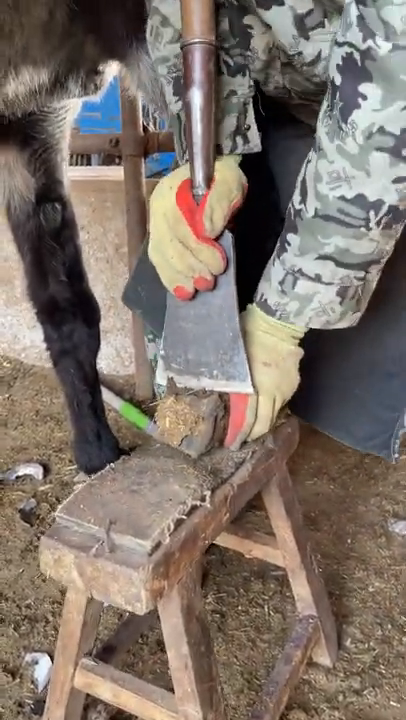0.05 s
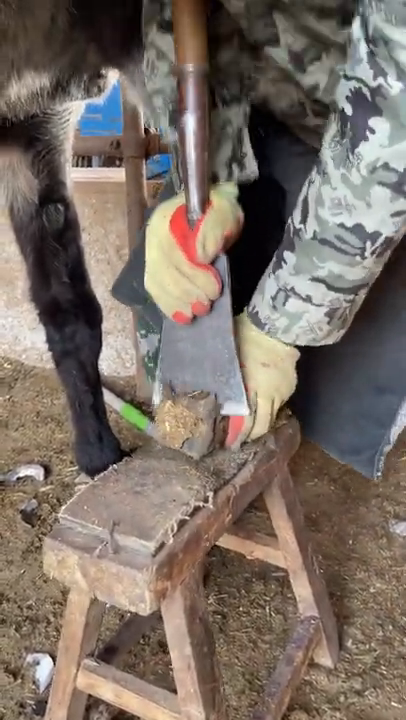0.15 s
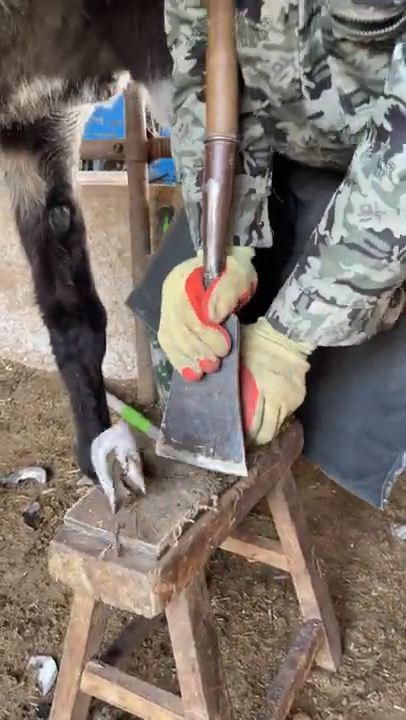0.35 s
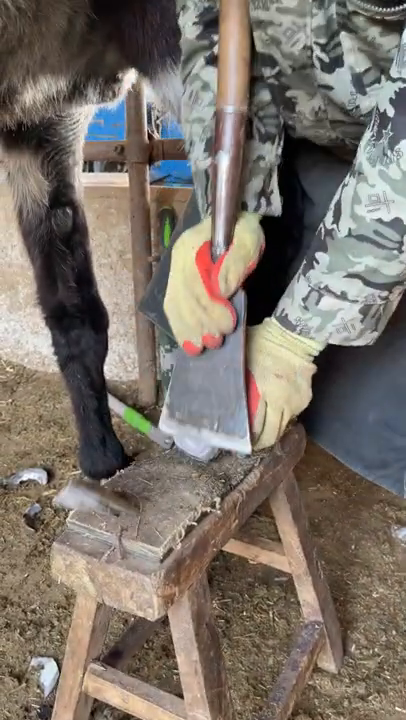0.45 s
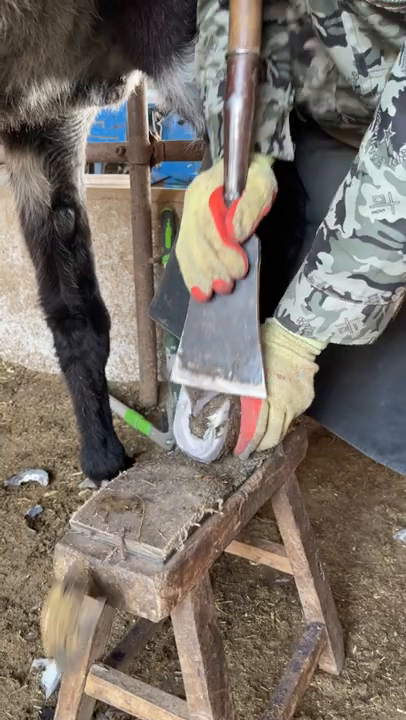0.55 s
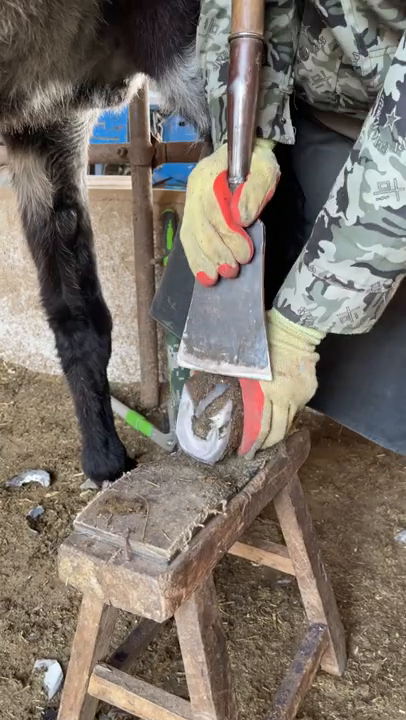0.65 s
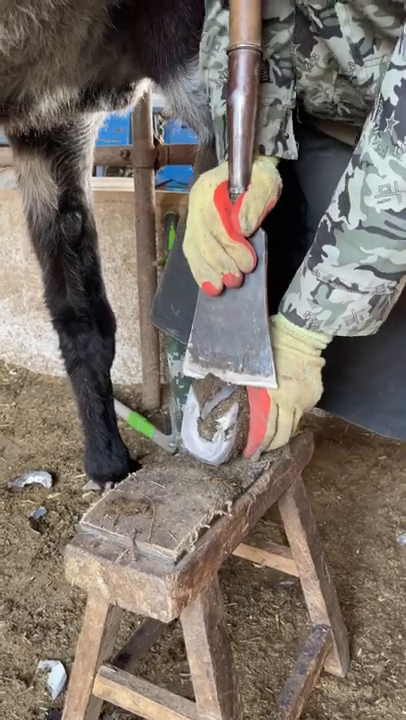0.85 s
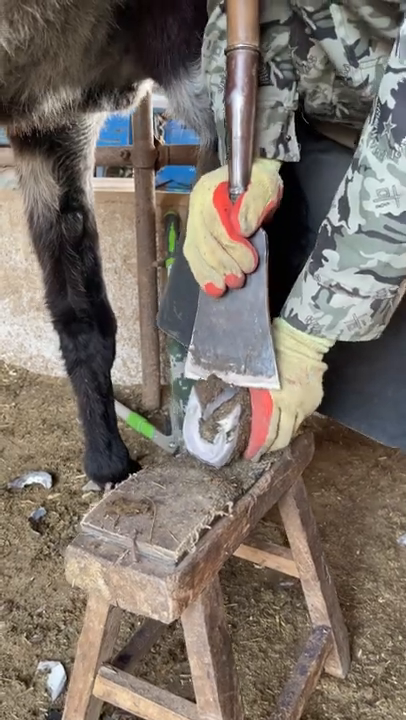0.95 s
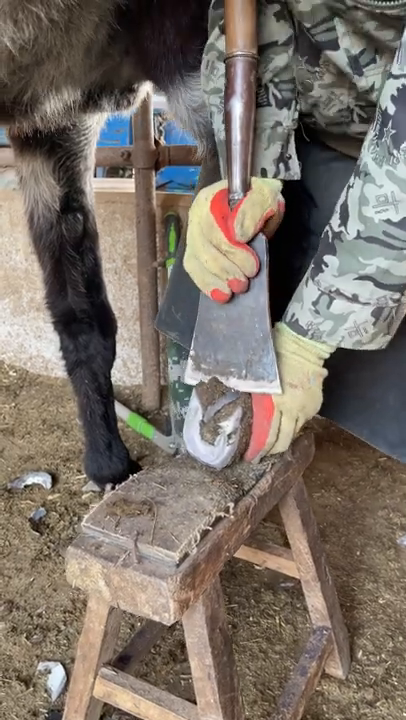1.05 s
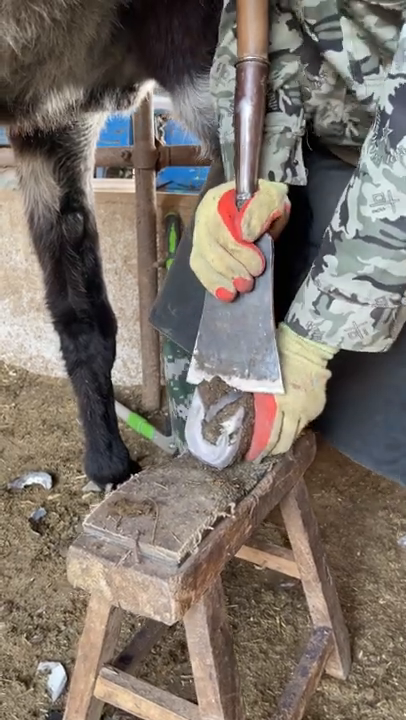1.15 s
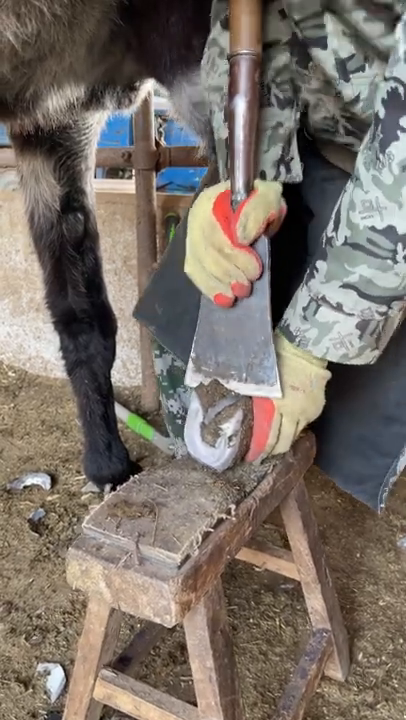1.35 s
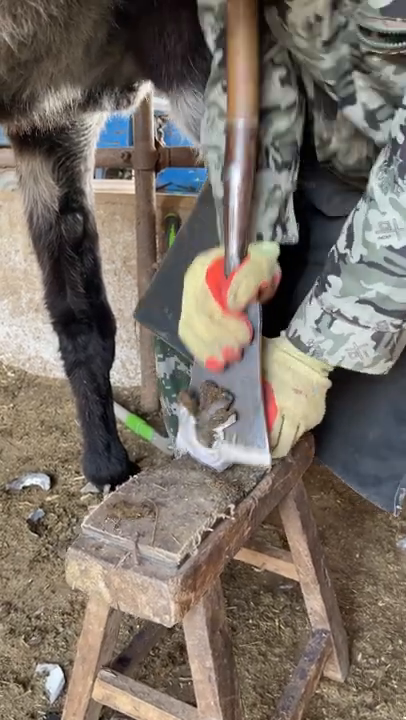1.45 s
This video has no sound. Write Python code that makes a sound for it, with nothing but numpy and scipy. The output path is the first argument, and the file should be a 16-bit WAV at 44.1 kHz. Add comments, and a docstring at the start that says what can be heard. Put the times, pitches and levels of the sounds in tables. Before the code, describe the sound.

Close up, a blade rasps briefly through hard hoof, squeaks, then cracks off the slice and knocks the wooden stool; faint ticks follow, and a second rasp begins at the end, in a lightly echoing shed.

```python
"""A broad steel blade pares a hard hoof on a wooden stool in a farm shed; a second cut begins late.
The horn rasps as shaped noise from dense tiny fractures, and squeaks as short bouts of narrow noise.
As the slice cracks off and the blade lands, clicks ring decaying sines of blade and stool.
Chips, glove and blade tick as brief resonant grit; a low rumble, hums and hiss lie beneath.
Far birds chirp as sliding sines heard only through their echo, and the shed answers the work."""
import sys
import numpy as np
from scipy import signal
from scipy.fft import rfft, irfft
from scipy.io import wavfile

SR = 44100
rng = np.random.default_rng(int(sys.argv[2]) if len(sys.argv) > 2 else 0)


def to_wav(s):
    """Save 16-bit WAV."""
    ch = np.atleast_2d(s).T  # columns
    pcm = np.round(np.clip(ch, -1, 1) * 32767)  # PCM
    wavfile.write(sys.argv[1], SR, pcm.astype(np.int16))


N = 66150
T = np.arange(N) / SR  # time [s]

# steady low bed, rescaled to RUMBLE_DB: (frequency [Hz], relative density [dB per Hz])
RUMBLE_SPECTRUM = [(20, -50), (32, -1.5), (48, 0), (62, -1), (85, -7), (125, -4), (165, -16.5),
                   (235, -17.5), (330, -24.5), (600, -36), (1200, -79)]
# faint airy bed, rescaled to HISS_DB: (frequency [Hz], relative density [dB per Hz])
HISS_SPECTRUM = [(200, 11.5), (600, 7), (1200, -0.5), (1800, -2.5), (2400, 1), (4000, -5.5), (6000, -9),
                 (8000, -2.5), (9700, 1.5), (11000, -13), (11800, -44), (15000, -61)]
# wavering steady tones: (frequency [Hz], rms level [dB])
HUMS = [(61, -48.5), (1725, -76.5)]
RUMBLE_DB, HISS_DB = -43.5, -57  # rms levels
HUM_WIDTH_HZ = 9  # a wider band wavers faster

# push on the blade, one list per cut: (time [s], level [dB])
CUT_PUSHES = [
    [(0.150, -71), (0.171, -62), (0.186, -66), (0.199, -45), (0.212, -46), (0.230, -43), (0.245, -38),
     (0.259, -48.5), (0.272, -32.5), (0.282, -27.5), (0.290, -44), (0.304, -50)],
    [(1.380, -69), (1.415, -57.5), (1.424, -51.5), (1.445, -48.5), (1.468, -42), (1.487, -46.5),
     (1.500, -38)],
]
# colour of the tearing horn: (frequency [Hz], relative density [dB per Hz])
RASP_SPECTRUM = [(150, -13), (350, 2.5), (650, -3), (1250, 1.5), (2000, 0.5), (2700, -0.5), (3900, -3.5),
                 (5000, -1.5), (7500, 0), (9800, 1.5), (11500, -10.5), (13000, -21), (15500, -39)]
# the push shakes leg and stool: (frequency [Hz], width [Hz], level over the push [dB])
SHUDDER_BANDS = [(84, 33, 3.5), (130, 42, -8), (262.6, 95, 1)]
RASP_DB = 9  # tearing, over the push
FRACTURES_PER_S, FRACTURE_SPREAD_DB = 5400, 2.5
CLUMP_DB, CLUMPS_HZ = 1.43, 196  # rms swing and centre rate of the bunching

# small contacts of chips, glove and blade:
# (time [s], nominal peak level [dB], frequency [Hz], width [Hz], time to fall 60 dB [s])
TICKS = [(0.200, -24.5, 1170, 594, 0.017), (0.4149, -19, 9220, 1930, 0.019),
         (0.473, -39.5, 8800, 1750, 0.087), (0.546, -41, 602, 90, 0.084), (0.547, -44, 1320, 400, .04),
         (0.551, -38.5, 149, 127, 0.33), (0.638, -44.5, 900, 950, .03), (0.693, -43, 2140, 484, 0.02),
         (0.7282, -34, 2150, 580, 0.018), (0.763, -44.5, 8000, 3060, .06), (0.768, -37.5, 230, 130, 0.095),
         (0.766, -42.5, 4130, 1190, 0.056), (0.779, -46, 2180, 805, 0.029), (0.849, -37, 8880, 2500, 0.011),
         (0.912, -44.5, 9000, 2400, 0.013), (0.974, -43.5, 6480, 1480, 0.024),
         (0.992, -55, 7000, 5000, .015), (1.336, -42.5, 7460, 3000, 0.018), (1.344, -36, 1070, 350, 0.017),
         (1.421, -33, 1110, 1580, 0.075), (1.4285, -29, 1850, 1200, 0.017), (1.458, -23.5, 2080, 930, .016),
         (1.459, -18.5, 1290, 600, 0.012)]
TICK_ATTACK_S = 0.0004

# the edge sticks and squeaks: (middle [s], length [s], level at the middle [dB], frequency [Hz])
SQUEAKS = [(0.2204, 0.0039, -31, 2610), (0.231, 0.0085, -31, 2680), (0.245, 0.018, -33.5, 3050),
           (0.2741, 0.0074, -18.5, 2610)]
SQUEAK_WIDTH_HZ = 610

# the slice cracks off: (time [s], level before scatter [dB])
CRACKS = [(0.2752, -11), (0.2765, -6.5), (0.2823, -14.5), (0.2860, -21)]
# ringing modes of blade and hoof: (frequency [Hz], level [dB], time to fall 60 dB [s])
BLADE_MODES = [(520, -23, 0.0192), (780, -14.5, 0.019), (1000, -12, 0.013), (1102, -13, 0.029),
               (1376, -12.5, .022), (1534, -8.5, 0.017), (1700, -20, 0.012), (2027, -25.5, 0.034),
               (2335, -17.5, 0.023), (2500, -12, 0.027), (2880, -15.5, 0.0224), (3470, -20.5, 0.021),
               (4050, -20, 0.0092), (5105, -18, 0.011)]
# ringing modes of the stool: (frequency [Hz], level [dB], time to fall 60 dB [s])
STOOL_MODES = [(89.6, -7.5, 0.054), (220, -19, 0.095), (248.3, -10, 0.061), (366, -17.5, 0.037)]
CRACK_SCATTER_DB = 4.5
KNOCK_S, KNOCK_DB = 0.2742, -1
BENDING_LAG_S = 0.0046  # travel time at 1 kHz; lower frequencies take longer
HORN_DB, HORN_HZ, HORN_WIDTH_HZ = 22.5, 1083, 1440  # dull clack, gain over the landing blow

# far birds, each chirp sliding down:
# (time [s], length [s], start pitch [Hz], end pitch [Hz], level ahead of the echo [dB])
CHIRPS = [(0.463, 0.066, 5400, 3846, -59.5), (0.51, 0.075, 4140, 3810, -59.5),
          (0.731, 0.035, 5390, 5090, -61.5), (0.757, 0.09, 4510, 3210, -58.5),
          (1.151, 0.052, 6290, 6130, -66.5), (1.165, 0.08, 4475, 2658, -61.5)]
CHIRP_WAVER, WAVER_HZ = 0.053, 201  # rms share of the pitch, centre rate
BIRD_T60_S = 0.63

# decay of the shed's echo: (frequency [Hz], time to fall 60 dB [s])
SHED_DECAY = [(100, 0.78), (300, 0.81), (1000, 0.62), (3000, 0.75), (7000, 1), (11000, 0.87), (14000, .2)]
# strength of the shed's echo: (frequency [Hz], level [dB])
ECHO_STRENGTH = [(80, -12), (250, -14.5), (600, -16.5), (1200, -22), (1900, -17), (2450, -20), (3100, -20),
                 (4500, -20), (7000, -22), (10000, -18.5), (14000, -19)]
ECHO_BUILD_S = 0.0065
GROUND_ECHO_S, GROUND_ECHO_DB = 0.0031, -6.5

# stereo spread of scattered sound: (frequency [Hz], gain of side signal [dB])
DIFFUSE_SIDE = [(60, -41), (300, -9.5), (700, -3.5), (1300, -6), (1800, -15.5), (2500, -8), (4000, -2.5),
                (5000, -5), (5800, -20), (7000, -5), (8500, -31), (14000, -28)]
# phase between the microphone ports: (frequency [Hz], lead of left over right [rad])
PORT_PHASE = [(20, 0), (1700, 0), (2700, 1.2), (3900, .9), (4700, 3.1), (5400, 5.4), (5800, 6.2),
              (6200, 6.35), (7000, 7.2), (8800, 9.3), (9400, 9.5), (10300, 10.7), (11000, 11.2),
              (11900, 12.57), (16000, 12.57)]
# balance of the microphone ports: (frequency [Hz], left minus right [dB])
PORT_BALANCE = [(40, 0.4), (250, -3), (1000, -2.2), (2200, 0), (3300, 0), (4650, -0.5), (5600, -.5),
                (10000, 0)]
LOW_CUT_HZ, CUTOFF_HZ = 45.5, 15000


def from_db(db):
    """Decibels to gain."""
    return 10 ** (np.asarray(db) / 20)


def rms_one(x):
    """Scale to unit rms."""
    return x / np.sqrt(np.mean(x ** 2) + 1e-20)


def at_hz(points, hz):
    """Read a table on a log-frequency axis."""
    f, value = np.transpose(points)
    return np.interp(np.log(np.maximum(hz, 1)), np.log(f), value)


def colour(x, spectrum):
    """Filter a steady sound with a spectrum and scale it to unit rms."""
    hz = np.arange(N // 2 + 1) * SR / N
    return rms_one(irfft(rfft(x) * from_db(at_hz(spectrum, hz)), N))


def resonate(x, hz, width_hz):
    """Band-pass around one resonance."""
    low = (np.sqrt(width_hz ** 2 + (2 * hz) ** 2) - width_hz) / 2
    high = min(low + width_hz, SR / 2 - 10)
    return signal.sosfilt(signal.butter(2, [low, high], "band", fs=SR, output="sos"), x)


def ring(clicks, hz, t60):
    """A two-pole resonator: a unit click sets off a decaying sine of starting height 1."""
    radius = np.exp(-np.log(1000) / (t60 * SR))
    angle = 2 * np.pi * hz / SR
    poles = [1, -2 * radius * np.cos(angle), radius * radius]
    return signal.lfilter([0, np.sin(angle)], poles, clicks + 1e-18)


def clicks_at(times, gains):
    """Single-sample clicks."""
    return np.bincount((np.asarray(times) * SR).astype(int), gains, N)[:N]


def dying(t, t60):
    """Exponential decay from t = 0."""
    return np.exp(-np.log(1000) * np.maximum(t, 0) / t60)


def diffuse(mid, side):
    """Spread a sound over two ports by adding a filtered side signal to one and taking it from the other."""
    hz = np.arange(N + 1) * SR / (2 * N)
    spread = irfft(rfft(side, 2 * N) * from_db(at_hz(DIFFUSE_SIDE, hz)))[:N]
    return mid + spread * np.array([[1], [-1]])


def background():
    """A low rumble, hums of narrow noise that waver in level, and a faint wide hiss."""
    low, mid, side = rng.standard_normal((3, N))
    hums = np.zeros(N)
    for hz, db in HUMS:
        # drop the first half, where the narrow filter builds up
        tone = resonate(rng.standard_normal(2 * N), hz, HUM_WIDTH_HZ)[N:]
        hums += from_db(db) * rms_one(tone)
    rumble = from_db(RUMBLE_DB) * colour(low, RUMBLE_SPECTRUM)
    hiss = from_db(HISS_DB) * diffuse(colour(mid, HISS_SPECTRUM), colour(side, HISS_SPECTRUM))
    return hums + rumble + hiss


def fractures():
    """Dense tiny breaks in the horn: randomly timed clicks of uneven size and either sign."""
    sizes = from_db(FRACTURE_SPREAD_DB * np.minimum(rng.exponential(1, N), 4))
    signs = rng.choice([-1, 1], N)
    return sizes * signs * (rng.random(N) < FRACTURES_PER_S / SR)


def rasp():
    """The push on the blade tears the horn in bunches of fibres and shakes leg and stool."""
    push = np.zeros(N)
    for cut in CUT_PUSHES:
        push += from_db(np.interp(T, *np.transpose(cut), left=-np.inf, right=-np.inf))
    bunching = rms_one(resonate(rng.standard_normal(N), CLUMPS_HZ, 2 * CLUMPS_HZ))
    clumps = from_db(CLUMP_DB * bunching)
    tearing = from_db(RASP_DB) * colour(clumps * fractures(), RASP_SPECTRUM)
    shudder = np.zeros(N)
    for hz, width, db in SHUDDER_BANDS:
        shudder += from_db(db) * rms_one(resonate(fractures(), hz, width))
    return push * (tearing + shudder)


def ticks():
    """Each tick is a brief gritty contact in one resonance, with a fast attack and decay."""
    out = np.zeros(N)
    for s, db, hz, width, t60 in TICKS:
        shape = np.clip((T - s) / TICK_ATTACK_S, 0, 1) * dying(T - s, t60)
        grit = signal.hilbert(resonate(rng.standard_normal(N), hz, width))
        flattened = grit.real / np.abs(grit)
        texture = rms_one(resonate(flattened, hz, 2 * width))
        out += from_db(db) / 2 * shape * texture  # halved: unit-rms noise peaks well above 1
    return out


def squeaks():
    """Short bouts of stick and slip: narrow noise, evened in strength but unsteady in pitch."""
    out = np.zeros(N)
    for s, length, db, hz in SQUEAKS:
        slip = signal.hilbert(resonate(rng.standard_normal(N), hz, SQUEAK_WIDTH_HZ))
        even = rms_one(slip.real / np.sqrt(np.abs(slip) ** 2 + np.var(slip) / 10))
        swell = np.exp(-2 * ((T - s) / length) ** 2)
        out += from_db(db) * swell * even
    return out


def bend(x):
    """Bending waves carry the highs first and the lows last, so a blow falls in pitch."""
    khz = np.arange(N + 1) * SR / (2 * N) / 1000
    phase_per_lag = 4000 * np.pi * np.sqrt(khz)  # delay falls with the root of frequency
    return irfft(rfft(x, 2 * N) * np.exp(-1j * BENDING_LAG_S * phase_per_lag))[:N]


def knock():
    """Cracks ring the blade; its landing clacks on the horn and rings blade and stool together."""
    s, db = np.transpose(CRACKS)
    scatter = CRACK_SCATTER_DB * rng.standard_normal((len(s), len(BLADE_MODES)))
    landing = bend(clicks_at([KNOCK_S], [from_db(KNOCK_DB)]))
    blade = np.zeros(N)
    for k, (hz, mode_db, t60) in enumerate(BLADE_MODES):
        cracks = clicks_at(s, from_db(db + scatter[:, k]))
        # neighbouring modes start with opposite sign
        blade += (-1) ** k * from_db(mode_db) * ring(landing + cracks, hz, t60)
    stool = np.zeros(N)
    for hz, mode_db, t60 in STOOL_MODES:
        stool += from_db(mode_db) * ring(landing, hz, t60)
    clack = from_db(HORN_DB) * resonate(landing, HORN_HZ, HORN_WIDTH_HZ)
    return blade + stool + clack


def birds():
    """Wavering downward chirps, so far off that only their echo arrives."""
    calls = np.zeros(N)
    for s, length, start_hz, end_hz, db in CHIRPS:
        along = np.clip((T - s) / length, 0, 1)
        waver = CHIRP_WAVER * rms_one(resonate(rng.standard_normal(N), WAVER_HZ, WAVER_HZ))
        hz = start_hz * (end_hz / start_hz) ** along * (1 + waver)
        swell = np.sqrt(np.abs(2 * np.sin(np.pi * along)))
        calls += from_db(db) * swell * np.sin(2 * np.pi * np.cumsum(hz) / SR)
    tails = rng.standard_normal((2, N)) * dying(T, BIRD_T60_S)
    echoes = [signal.fftconvolve(calls, 2 * tail / np.linalg.norm(tail))[:N] for tail in tails]
    return diffuse(*echoes)


def shed(x):
    """A diffuse echo of noise bands, each building up quickly and dying at its own rate."""
    edges = np.geomspace(45, 16000, 15)
    white = rng.standard_normal((2, 2, N))
    tail = np.zeros((2, N))
    for k, (low, high) in enumerate(zip(edges, edges[1:])):
        hz = np.sqrt(low * high)
        shape = dying(T, at_hz(SHED_DECAY, hz)) * np.minimum(T / ECHO_BUILD_S, 1)
        band = resonate(white[k % 2], hz, high - low)  # neighbouring bands use separate noise
        tail += from_db(at_hz(ECHO_STRENGTH, hz)) * band * shape / np.linalg.norm(shape)
    return diffuse(*signal.fftconvolve(x[None], tail, axes=1)[:, :N])


def scene():
    """Close work on the hoof, a ground bounce that widens it, the shed's echo, birds and background."""
    work = rasp() + squeaks() + knock() + ticks()
    bounce = from_db(GROUND_ECHO_DB) * np.interp(T - GROUND_ECHO_S, T, work)
    return diffuse(work, bounce) + shed(work) + birds() + background()


def record(dry):
    """The two ports differ in phase and level; the lowest bass and the top are cut."""
    hz = np.arange(N + 1) * SR / (2 * N)
    sides = np.array([[.5], [-.5]])  # left and right each take half the difference
    ports = from_db(sides * at_hz(PORT_BALANCE, hz)) * np.exp(1j * sides * at_hz(PORT_PHASE, hz))
    heard = irfft(rfft(dry, 2 * N) * ports)[:, :N]
    heard = signal.sosfilt(signal.butter(3, LOW_CUT_HZ, "high", fs=SR, output="sos"), heard)
    clipped = np.clip(heard, -1, 1)
    return signal.sosfilt(signal.cheby1(10, .5, CUTOFF_HZ, fs=SR, output="sos"), clipped)


dry = scene()
out = record(dry)
to_wav(out)
```